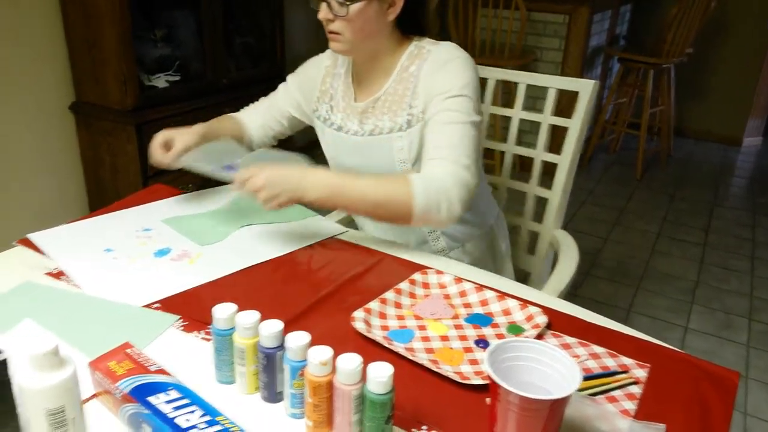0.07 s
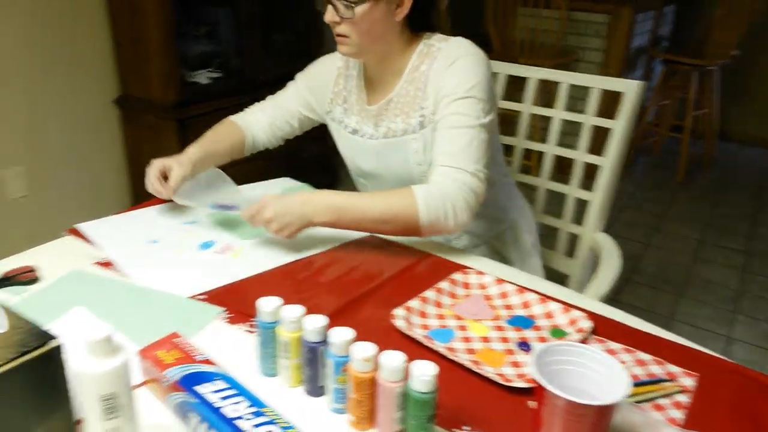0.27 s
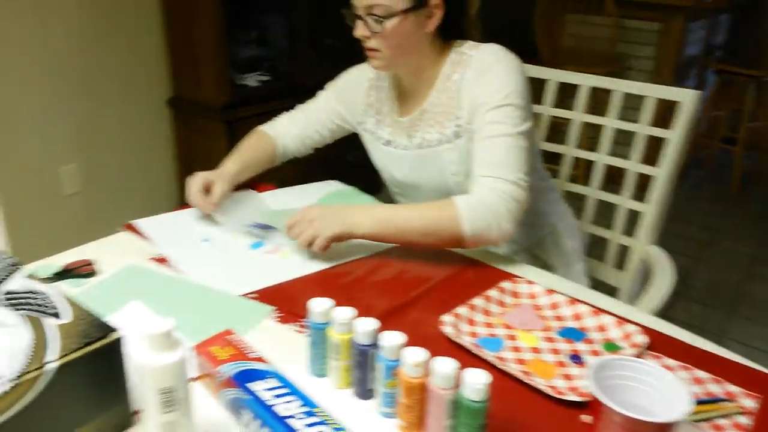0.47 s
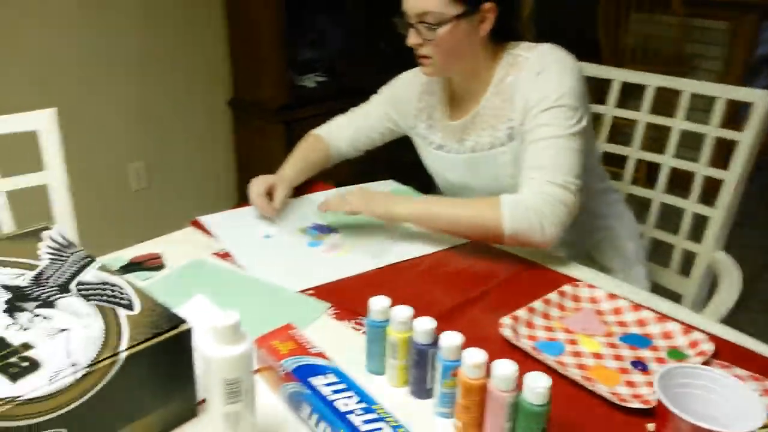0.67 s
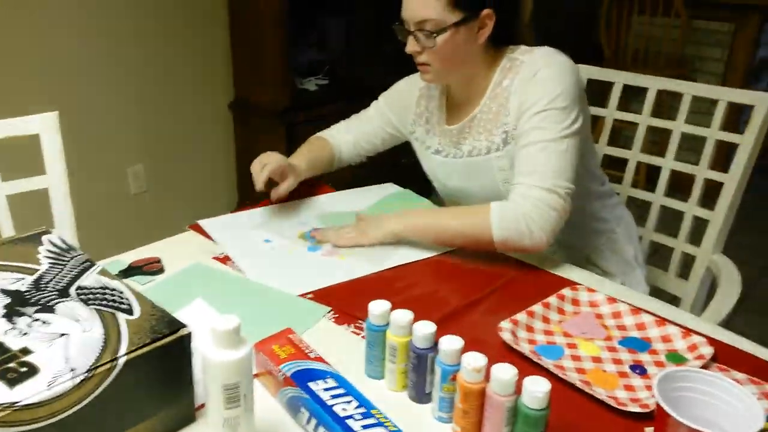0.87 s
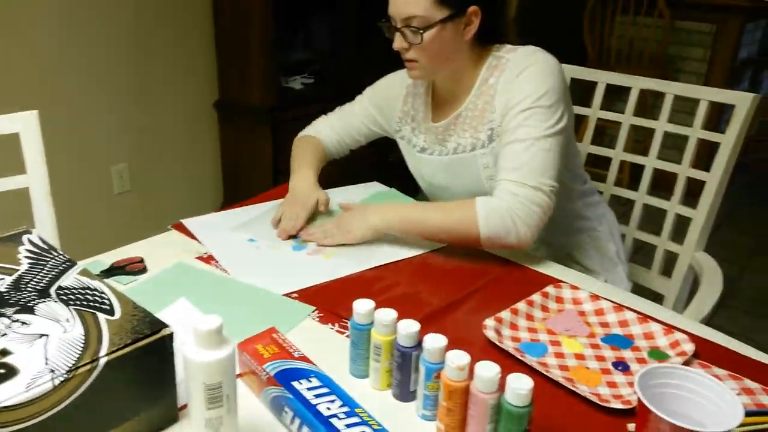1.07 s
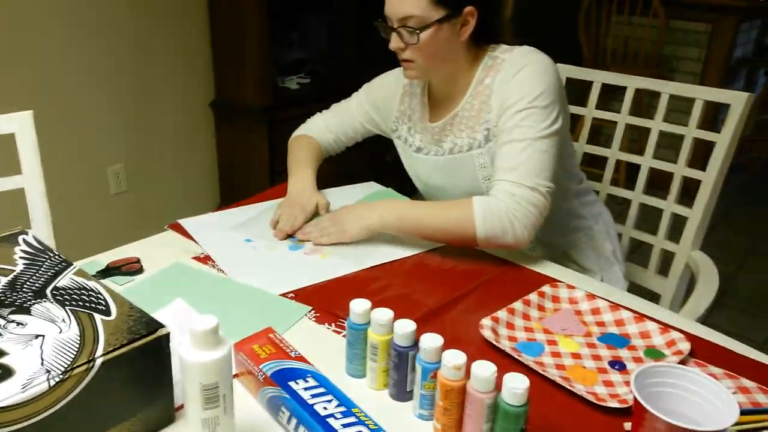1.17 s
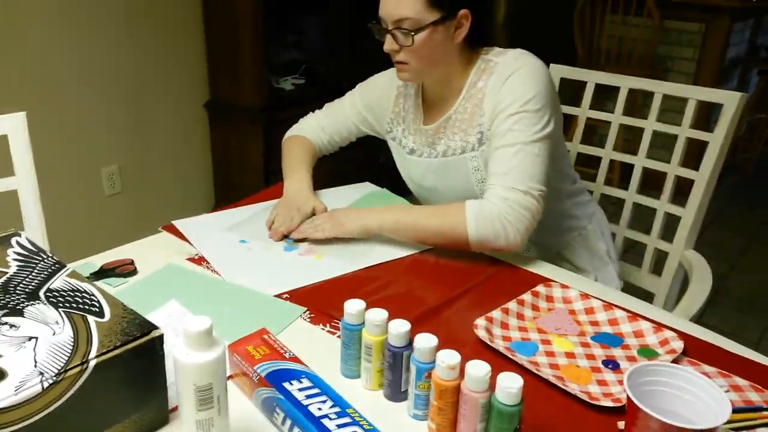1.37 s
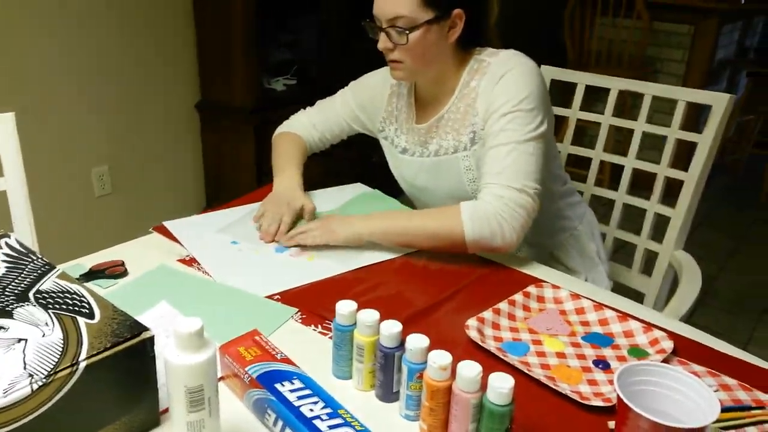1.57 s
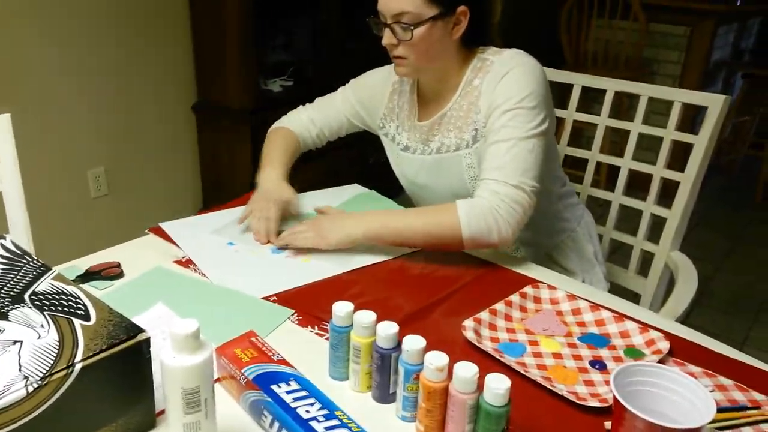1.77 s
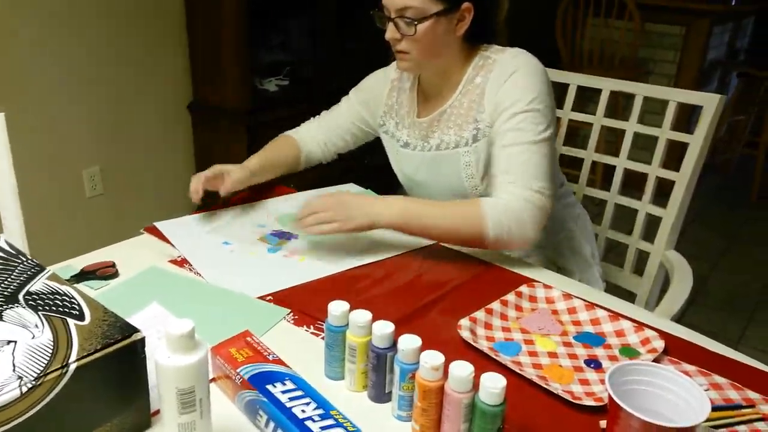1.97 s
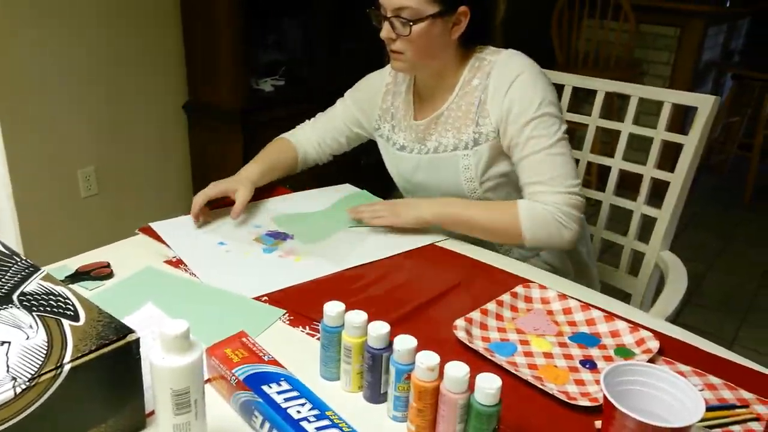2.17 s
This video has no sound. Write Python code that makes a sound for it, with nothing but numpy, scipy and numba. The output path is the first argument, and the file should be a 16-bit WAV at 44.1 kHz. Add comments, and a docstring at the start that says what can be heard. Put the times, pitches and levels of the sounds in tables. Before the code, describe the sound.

Wax paper crinkles close by, to the right, in a quiet, dry room. Its creases snap in swarms of tiny bright ticks, busiest for the first 0.7 seconds. At about 1 second a palm softly pats the table amid more crackle. From 1.2 seconds only faint clicks remain, with a small crinkle near 1.9 seconds. A faint electrical hum and room hiss fade down after the pat.

```python
"""Folding wax paper on a table

Close up, to the right of a two-port microphone in a quiet, dry room, hands fold and press a sheet of wax
paper. Its creases snap in swarms of tiny bright ticks, and a palm pats the table once, about a second in.
Then the paper thins out to faint clicks, while the mains hum and room air beneath it fade down."""
import sys
import numpy as np
from scipy import signal
from scipy.fft import rfft, irfft
from scipy.io import wavfile
from scipy.ndimage import uniform_filter1d, map_coordinates
from numba import njit

SR = 44100
rng = np.random.default_rng(int(sys.argv[2]) if len(sys.argv) > 2 else 0)


def materialize(psi):
    """Save the field psi as 16-bit PCM at rate SR to the path in sys.argv[1].

    A 1-D psi becomes a single channel; in a 2-D psi each row is a channel.
    """
    bounded = np.clip(np.atleast_2d(psi).T, -1, 1)
    quanta = np.round(bounded * 32767).astype(np.int16)
    wavfile.write(sys.argv[1], SR, quanta)


N = 97637
SPLIT_HZ = 3880  # border between the paper's middle and treble


def undb(db):
    return 10 ** (np.asarray(db) / 20)


def curve(table, col, at):
    table = np.array(table, float)
    return np.interp(at, table[:, 0], table[:, col])


def colour(x, *tables):
    """Shape a spectrum by (Hz, dB) points on a log axis."""
    log_hz = np.log(np.fft.rfftfreq(2 * N, 1 / SR) + 1)
    db = sum(np.interp(log_hz, np.log(t[:, 0] + 1), t[:, 1]) for t in map(np.array, tables))
    return irfft(rfft(x, 2 * N) * undb(db), 2 * N)[:N]


def walk(rate):
    """Random levels held 1 / rate s and slewed; spread near 1."""
    hold = int(SR / rate)
    return 1.15 * uniform_filter1d(np.repeat(rng.standard_normal(N), hold)[:N], hold)


def ports(balance_db):
    """Left and right gains; a negative balance leans right."""
    return undb(np.array([[balance_db], [-balance_db]]) / 2)


@njit
def rings(start_s, hz, t60, size, phase):
    """Sum of dying sines, each free to start between samples."""
    y = np.zeros(N)
    for k in range(len(start_s)):
        pole = 2j * np.pi * hz[k] / SR - np.log(1000.) / (t60[k] * SR)
        onset = start_s[k] * SR
        first = int(np.ceil(onset))
        z = size[k] * np.exp(pole * (first - onset) + 1j * phase[k])
        step = np.exp(pole)
        for j in range(max(first, 0), min(N, first + int(t60[k] * SR))):
            y[j] += z.imag
            z *= step
    return y


def room_air():
    """Room noise, largely alike at both ports in the bass."""
    # Colour of the air. Each row: frequency in Hz, gain in dB.
    spectrum = [(20, -28), (45, -20.5), (100, -5.5), (200, -10), (420, -13), (600, -20.5), (2500, -22),
                (15000, -20)]
    common, left, right = rng.standard_normal((3, N))
    bass = signal.lfilter(*signal.butter(1, 605, fs=SR), common)
    air = np.array([colour(bass + 0.78 * own, spectrum) for own in (left, right)])
    air /= np.sqrt(np.mean(air ** 2))
    return air * undb(-76) * ports(balance_db=-5.5)


def mains_hum(t):
    """Mains tones that waver slightly, joined halfway by a faint drone."""
    # Mains harmonics. Each row: frequency in Hz, relative level in dB.
    harmonics = [(240, -77), (360, -83.5), (480, -91.5), (720, -96)]
    waver_db, drone_from_s, drone_rise_s = 1.36, 1.06, 0.096

    def tone(hz, db):
        level = undb(db + waver_db * walk(rate=37))
        return np.sqrt(2) * level * np.sin(2 * np.pi * (hz * t + rng.random()))

    drone = tone(hz=313, db=-84) / (1 + np.exp((drone_from_s - t) / drone_rise_s))
    return (sum(tone(hz, db) for hz, db in harmonics) + drone) * ports(balance_db=-10.5)


def palm_pat():
    """A palm lands in a few quick, soft pushes that ring the table top."""
    # Contacts of the palm. Each row: start in seconds, relative level in dB.
    contacts = [(.981, -41), (1.000, -41.5), (1.011, -43), (1.041, -52)]
    # Modes of the table top. Each row: frequency in Hz, gain in dB, T60 in seconds.
    modes = [(116, -7, 0.027), (242, -6, 0.051), (436, -0.5, 0.029), (672, -8, 0.041), (1021, -3.5, 0.053),
             (1562, -2.5, 0.043)]
    push_s, detune = 0.00051, 0.024
    strikes = [(start, hz * (1 + detune * rng.standard_normal()), t60, undb(db + mode_db))
               for start, db in contacts for hz, mode_db, t60 in modes]
    knock = rings(*np.array(strikes).T, 2 * np.pi * rng.random(len(strikes)))
    knock -= uniform_filter1d(knock, SR // 100)  # thins the deep bass
    return uniform_filter1d(knock, int(push_s * SR)) * ports(balance_db=-8)


def crease_strength(start, hz):
    """Handling and snapping creases set the size of each tick by its time and pitch."""
    # How hard the sheet is handled. Each row: time in seconds, treble and middle in relative dB.
    handling = [(0, -37.5, -38), (.025, -29.5, -40.5), (.045, -43, -49), (.075, -43.5, -45.5),
                (.12, -36.5, -43.5), (.19, -50, -49.5), (.255, -50, -45.5), (.3, -65, -42.5),
                (.325, -36.5, -47), (.35, -56.5, -53), (.39, -37, -43.5), (.435, -61, -46),
                (.47, -46.5, -49), (.495, -39, -42.5), (.525, -52, -53.5), (.57, -42.5, -46),
                (.635, -38.5, -42.5), (.675, -45, -48.5), (.7, -53.5, -54), (.74, -66, -67),
                (.81, -56.5, -72), (.88, -48, -62), (.92, -43.5, -47.5), (.95, -58, -60),
                (.975, -44.5, -47), (1.02, -56, -48.5), (1.08, -64.5, -65.5), (1.13, -60, -64),
                (1.155, -46.5, -50.5), (1.2, -63.5, -66), (1.25, -72, -77), (1.63, -79.5, -87),
                (1.675, -72.5, -73), (1.73, -91, -101), (1.893, -78, -80), (1.908, -55.5, -69.5),
                (1.96, -78.5, -79), (2.21, -85, -92.5)]
    # Snapping creases. Each row: peak time in seconds, relative level in dB,
    # middle against treble in dB, decay time in seconds.
    snaps = [(0.0107, -23, -5.5, 0.0069), (0.0364, -19.5, -13, 0.012), (0.094, -24.5, -8.5, 0.0057),
             (0.113, -19, -29, 0.0048), (0.1995, -31.5, -2, 0.025), (0.243, -30, -9, 0.03),
             (0.2712, -18, -29, 0.0081), (.384, -23.5, -10, 0.0033), (0.4466, -24, -13, 0.0067),
             (0.6656, -23.5, -12, 0.0061), (0.7478, -32.5, -6.5, 0.016), (0.8208, -36, -4.5, 0.0074),
             (0.9809, -26, 6.5, 0.0018), (0.9976, -35.5, 6, 0.0091), (1.098, -40, -31, 0.0056),
             (1.284, -52.5, -18, 0.015), (1.303, -64, 14, 0.0094), (1.386, -57.5, 0.5, 0.0075),
             (1.427, -57, -3, 0.0073), (1.855, -52.5, -35, 0.0056)]
    swarm_db = -6
    power = undb(2 * np.array([curve(handling, 1, start), curve(handling, 2, start)]))
    for peak_s, db, middle_db, decay_s in snaps:
        rise_s = 0.0079 if db < -45 else 0.0014  # weak creases give way slowly
        swell = np.exp(-2 * np.abs(start - peak_s) / np.where(start > peak_s, decay_s, rise_s))
        power += swell * undb(2 * (db + swarm_db + np.array([[0], [middle_db]])))
    treble, middle = power
    treble_share = 1 / (1 + (SPLIT_HZ / hz) ** 4)
    return np.sqrt(middle ** (1 - treble_share) * treble ** treble_share)


def crease_ticks():
    """Creases give way in clumps of short ticks of every pitch, each from its own spot."""
    ticks_per_s, tick_db, clump_db, scatter_db = 24000, 17, 1.5, 2.5
    count = int(ticks_per_s * N / SR)
    when, pitch, chance, turn = rng.random((count, 4)).T
    spot = rng.standard_normal(count)
    start, hz = when * N / SR, 300 + 14700 * pitch ** 2
    t60 = 0.0042 * 7000 / hz  # high ticks die sooner
    clump = walk(rate=450)[(start * SR).astype(int)]
    size = crease_strength(start, hz)
    size *= undb(tick_db + clump_db * clump - scatter_db * np.log(chance + 0.0018))
    size *= np.sqrt(pitch / t60 / ticks_per_s)  # evens out the power per Hz
    return np.array([start, hz, t60, size, 2 * np.pi * turn, spot])


def lone_clicks():
    """Single dry clicks from the centre of the sheet, each one very short, high ring."""
    # Each row: start in seconds, relative level in dB.
    clicks = [(.0112, -12), (.0184, -8), (0.1197, -23), (0.269, -5.5), (.272, -13), (.325, -19),
              (.4462, -18), (0.8199, -10), (.9985, -24), (1.405, -41), (1.508, -44), (1.6023, -49),
              (1.633, -47), (1.6701, -43), (1.711, -50), (1.8126, -48), (1.8305, -45), (1.848, -41),
              (1.8974, -32), (2.0169, -44), (2.1495, -46)]
    hz, t60, phase, spot = 10650, 0.0008, 1, 0
    return np.array([(start, hz, t60, undb(db), phase, spot) for start, db in clicks]).T


def pockets(x):
    """Random peaks and dips over pitch that drift as the sheet changes shape."""
    depth_db, drift_s, width_octaves, top_hz = 8, .05, .17, 1600
    hz, times, spectra = signal.stft(x, SR, nperseg=1024)
    field = rng.standard_normal((120, 40))
    octaves = np.log2(np.maximum(hz, 250) / 250)
    grid = np.meshgrid(times / drift_s, octaves / width_octaves)
    db = depth_db * map_coordinates(field, grid, order=1) / (1 + (hz[:, None] / top_hz) ** 2)
    return signal.istft(spectra * undb(db), SR, nperseg=1024)[1][:, :N]


def wax_paper():
    """The sheet's ticks and clicks reach the right port louder and mostly sooner."""
    # Colour of the paper. Each row: frequency in Hz, gain in dB.
    spectrum = [(250, -12), (450, -11), (600, -16.5), (900, -7.5), (1350, -9), (2200, -4), (5700, -4),
                (7400, -1), (11000, -8), (14500, -20)]
    # Balance at the ports. Each row: frequency in Hz, left against right in dB.
    balance = [(500, -8.5), (5000, -4.5), (7500, -14), (15000, -17)]
    port_lag_s, spread_s = .00007, .00012
    start, hz, t60, size, phase, spot = np.hstack([crease_ticks(), lone_clicks()])
    low_cut = signal.butter(4, SPLIT_HZ, "high", fs=SR, output="sos")
    channels = []
    for side in (1, -1):  # left, right
        arrival = start + side * (port_lag_s + spread_s * spot) / 2
        high, low = (rings(arrival[band], hz[band], t60[band], size[band], phase[band])
                     for band in (hz > SPLIT_HZ, hz <= SPLIT_HZ))
        ticks = low + signal.sosfilt(low_cut, high)  # the high ticks stay out of the bass
        channels.append(colour(ticks, spectrum, np.array(balance) * [1, side / 2]))
    return pockets(np.array(channels))


def scene():
    """Paper and palm with a short room tail, over the fading hum and air."""
    # Fade of the background. Each row: time in seconds, gain in dB.
    fade = [(0, 14.6), (.6, 13.6), (1.0, 12.2), (1.3, 4.6), (2.21, 0.71)]
    room_t60_s, room_db = 0.088, -5
    t = np.arange(N) / SR
    near = wax_paper() + palm_pat()
    tail_t = t[:SR // 2]
    tail = rng.standard_normal((2, len(tail_t))) * undb(-60 * tail_t / room_t60_s) * (tail_t > .002)
    tail /= np.sqrt(np.sum(tail ** 2, axis=1, keepdims=True))
    room = signal.fftconvolve(near, tail, axes=1)[:, :N]
    background = (mains_hum(t) + room_air()) * undb(curve(fade, 1, t))
    return near + undb(room_db) * room + background


def record(dry):
    """The highest treble is cut off steeply above 14.6 kHz."""
    top_hz = 14600
    return signal.sosfilt(signal.cheby1(12, .5, top_hz, fs=SR, output="sos"), dry)


dry = scene()
out = record(dry)
materialize(out)
```